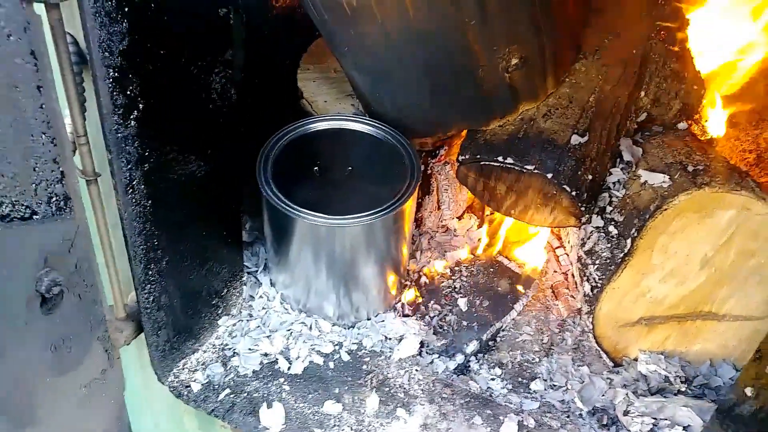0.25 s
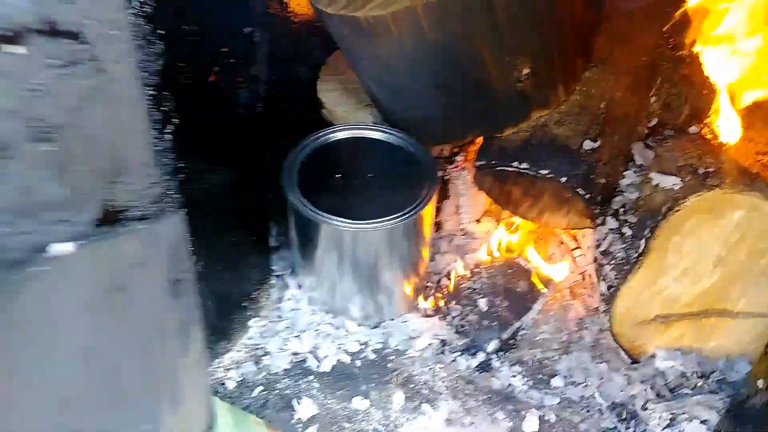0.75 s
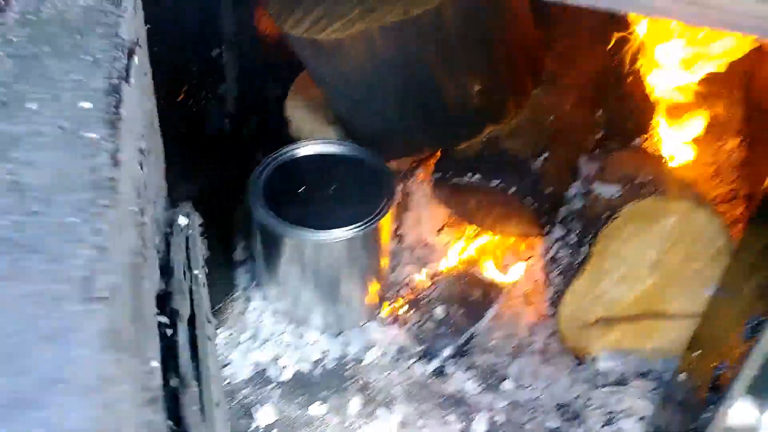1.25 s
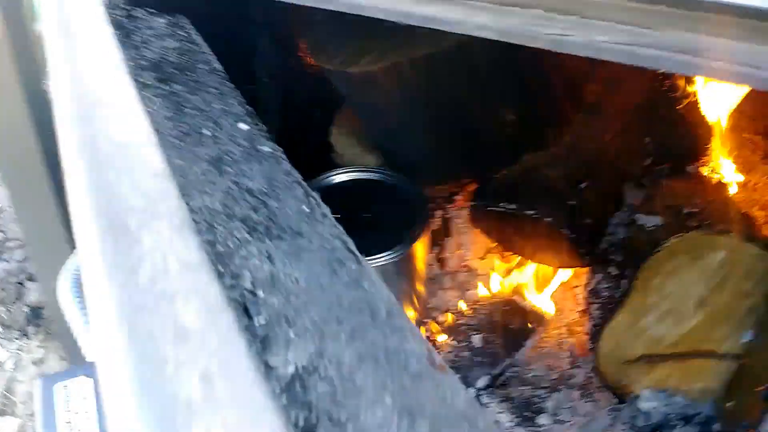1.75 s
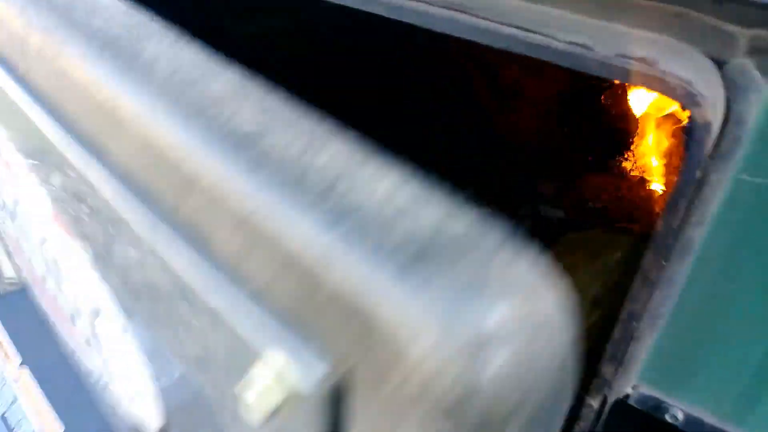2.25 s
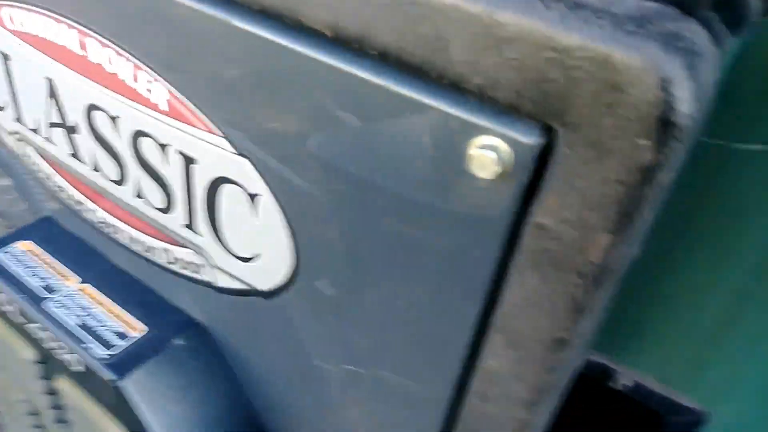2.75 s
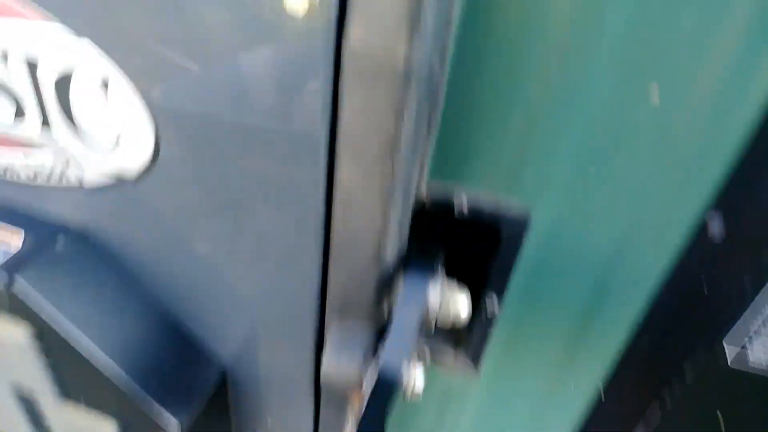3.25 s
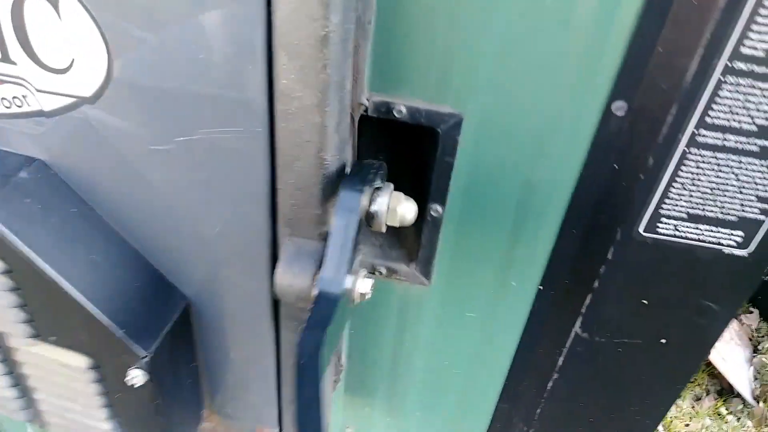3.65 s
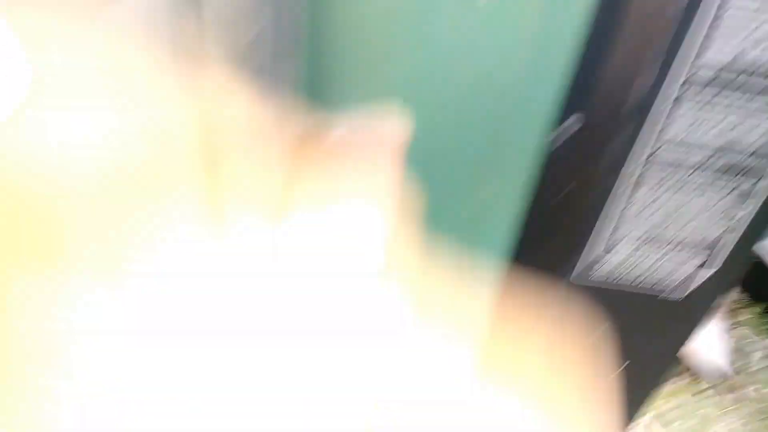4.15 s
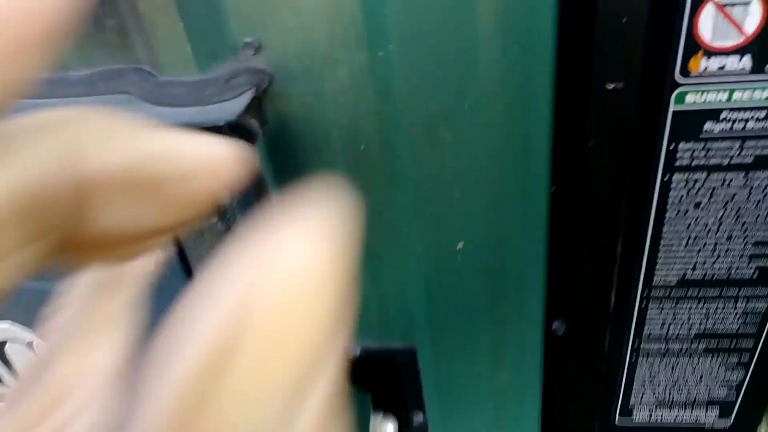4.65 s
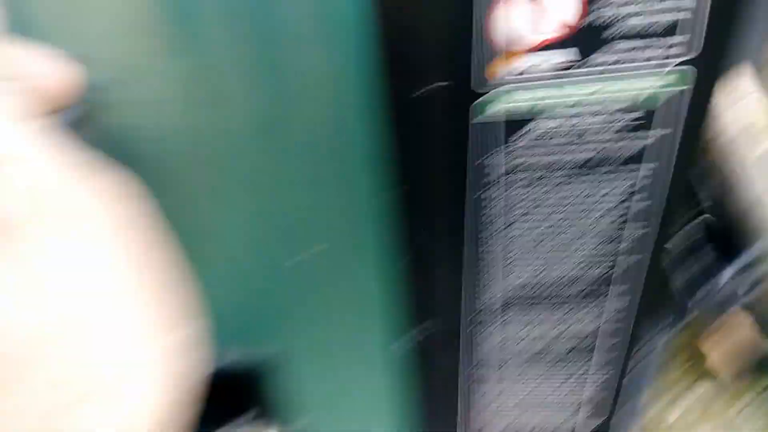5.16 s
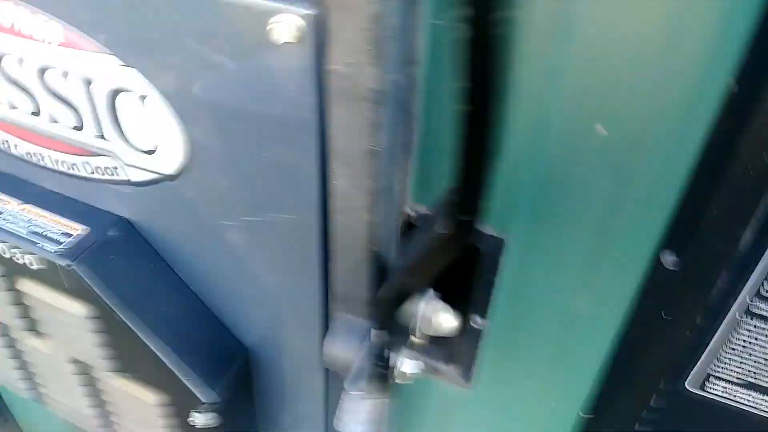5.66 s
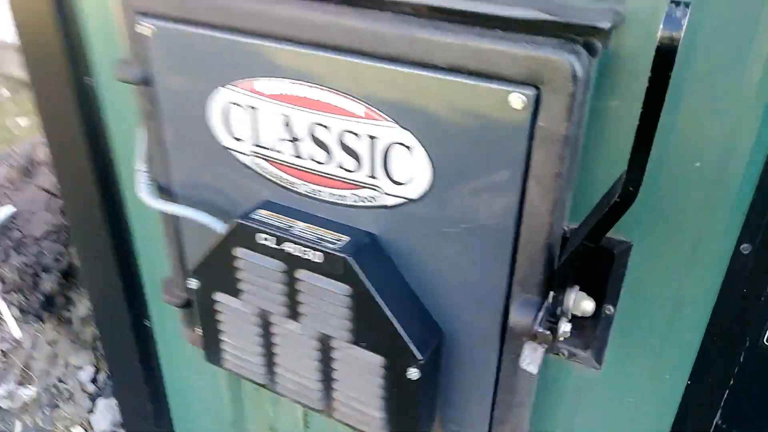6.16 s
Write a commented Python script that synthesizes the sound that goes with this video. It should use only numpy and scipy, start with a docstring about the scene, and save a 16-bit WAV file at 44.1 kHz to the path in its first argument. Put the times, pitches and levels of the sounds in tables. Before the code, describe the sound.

An open wood fire rumbles and snaps among bird calls, then a heavy iron door bumps shut and its lever bangs home in two loud metallic bursts.

```python
"""The iron door of an outdoor wood furnace bumps its frame, and its lever bangs home in two rattling
bursts: each contact knocks, rings the latch and lever as decaying modes and booms in the cabinet.
The fire is shaped noise, muffled by the closing door and hissing in the gap; struck noise bands
make its snaps. Iron rubs and rattles, a motor hums in sines, and birds call in gliding, echoing
tones over faint microphone hiss, until soft rustles mark the microphone backing away."""
import sys
import numpy as np
from scipy import signal
from scipy.fft import rfft, irfft, next_fast_len
from scipy.io import wavfile
from scipy.ndimage import uniform_filter1d, minimum_filter1d, map_coordinates

SR = 44100
rng = np.random.default_rng(int(sys.argv[2]) if len(sys.argv) > 2 else 0)


def waveform_to_disk(signal):
    """Save audio, clipped to [-1, 1], as 16-bit WAV at the path in sys.argv[1]."""
    frames = np.transpose(np.atleast_2d(signal))
    scaled = np.clip(frames, -1, 1) * 32767
    samples = np.round(scaled).astype(np.int16)
    wavfile.write(sys.argv[1], SR, samples)


N = 282841
T = np.arange(N) / SR  # time in seconds

# From this moment the lever is wedged in its catch.
WEDGED_S = 5.0
# The microphone backs away; the hiss is lost fastest.
LEAVE_S, LEAVE_DB_PER_S, LEAVE_HISS_DB_PER_S = 5.41, -14.5, -49

# All levels in the tables are relative, in dB; t60 is the time of a 60 dB decay.
# Metal striking metal. Each row: start in seconds, then the levels in dB of the clank,
# the cabinet boom, the sharp crack and the dead punch of the contact.
BLOWS = [(4.1840, -3, -5.5, -29.5, -1), (4.1955, -19, 3, -14.5, -20.5), (4.2217, 5.5, -14.5, 1, 2),
         (4.2268, 0, -5, -23, 3), (4.2350, -6, 1, -6.5, -4.5), (4.2502, -3, -2, -3.5, -4.5),
         (4.2595, 2.5, -2, -0.5, -6.5), (4.2733, -2.5, -7, -5, 3), (4.2880, -2, -11, -21.5, -3),
         (4.2975, 2.5, -1.5, -22, -12.5), (4.473, -31.5, -20.5, -26.5, -43),
         (4.484, -33.5, -34, -32.5, -47), (4.561, -50.5, -32.5, -30.5, -51), (4.6000, -44, -24, -37, -48),
         (5.1115, -22.5, -42, -26.5, -35.5), (5.1180, 4.5, -31, -27.5, -8), (5.1235, 1, -24, -18.5, -6),
         (5.1290, -3, -29.5, -19, -6.5), (5.1364, -3.5, -19, -11.5, 0.5), (5.1413, -4.5, -9, -20.5, -9),
         (5.1528, -5.5, -6.5, -5, -8), (5.1565, -21.5, 4, -29, -7.5), (5.1800, -25.5, -9, -23, -24.5)]
# The door bumping its frame. Each row: start in seconds, thud level in dB, crack level in dB.
BUMPS = [(2.931, -5, -18.5), (2.9345, -22, -61), (2.9399, -19, -45), (2.9468, -16.5, -60),
         (2.992, -25.5, -37), (3.025, -29, -39)]
# Modes of the cast door slab. Each row: frequency in Hz, level in dB, t60 in seconds.
SLAB = [(203.5, -14, 0.44), (244, -10, 0.13), (298, -2.5, 0.13), (386, -4.5, .2), (447.5, -16.5, 0.15),
        (559, -5.5, 0.19), (728, -12.5, 0.21), (1217, -6.5, 0.089), (1505, -12.5, 0.024), (1830, -1, 0.077),
        (2050, -1, 0.04)]
# Modes of the steel lever and its latch. Each row: frequency in Hz, level in dB while free,
# level in dB once wedged in the catch, t60 in seconds before the wedged limit.
LEVER = [(727, 1.5, -19, .16), (807, -3.5, -7, .23), (884, -.5, -10, .23), (917, -11, -20, .4),
         (1023, -3, -3, .16), (1041, -7, -.5, .16), (1104, -4, -12, .15), (1157, -2, -15, .18),
         (1180, -4, -11.5, .22), (1208, -1, -12.5, .2), (1262, -5.5, -16, .2), (1280, -4, -15.5, .23),
         (1394, -5.5, -8.5, .26), (1417, -2, -2, .16), (1432, -4, -2, .16), (1545, -6.5, -13.5, .2),
         (1620, -9, -7.5, .15), (1712, -8.5, -8, .22), (1868, -6, -8, .22), (1910, -7.5, -13.5, .2),
         (2003, -12.5, -10, .2), (2044, -10.5, -2, .18), (2105, -9.5, -5, .15), (2247, -8, -21, .15),
         (2893, -17.5, -21, .22), (4734, -17, -27, .14), (5390, -22, -36, .13)]
# The lever's longer, weaker modes. Each row: frequency in Hz, level in dB while free,
# level in dB once wedged, t60 in seconds before the wedged limit.
AFTER_RING = [(1550, -24, -30, .8), (1981, -20, -24, .62), (2051, -20.5, -25, .95), (2313, -29, -28, .9),
              (3052, -28, -39, .55), (3440, -36, -46, .75), (3693, -27.5, -44, .62), (3732, -28, -44, .66),
              (3876, -35, -44, .55), (4958, -38, -50, .5), (6842, -45, -62, .45)]
# Modes of the door slab and cabinet panels. Each row: frequency in Hz, level in dB while free,
# level in dB once clamped together, t60 in seconds before the clamped limit.
CABINET = [(94, -21.5, -25, 0.96), (139, -18.5, -18.5, 0.55), (169, -2.5, 6.5, 0.46),
           (181.2, -13.5, 1.5, 0.55), (202.7, -17.5, -1.5, 0.92), (222, 2, 4.5, 0.5),
           (247.5, -10, -4.5, 0.76), (257.2, 1, 0, 0.32), (281, -3.5, 5.5, 0.17), (333.4, -7, -11.5, 0.6),
           (377, -11.5, -8, 0.35), (444, -12.5, -5, 0.6), (538, -15.5, 1, 0.26), (535, -21.5, -24, 0.85),
           (630, -15.5, -21, 0.35), (836, -20.5, -22, 0.31)]
# Crowds of weaker modes in the slab, the latch and the cabinet, then in the cracks of the blows
# and of the door's edge. Each row: frequency in Hz, level in dB, t60 in seconds.
SLAB_CROWD = [(60, -11, 0.3), (269.4, 6.5, 0.51), (550, -5.5, 0.39), (936, -4, 0.0847), (1730, 4.5, 0.15),
              (2126, -24, 0.073), (2946, -24, 0.038), (6300, -21, 0.045), (9900, -73, .05)]
LATCH_CROWD = [(200, -15, 0.034), (570, 6.5, 0.12), (989, 10, 0.052), (2130, 3.5, 0.16),
               (2520, -19.5, 0.12), (4950, -43.5, 0.45), (9000, -77, .1), (16000, -57.5, 0.07)]
CABINET_CROWD = [(24.68, -22, 0.24), (60.5, -19.5, .6), (110, -9.5, 1), (250.2, -4.5, 1), (513, -11, 0.68),
                 (1040, -11, 0.42), (1780, -16.5, 0.59), (3100, -21, 0.3), (8130, -54, 0.3)]
CRACK_CROWD = [(300, -15.5, .05), (1500, 14, 0.17), (2780, 12.5, 0.063), (5030, 4, 0.15), (7900, -11, 0.13),
               (10500, -31.5, 0.11), (13440, -19, 0.25), (16000, -29, 0.071)]
EDGE_CROWD = [(900, -4, 0.057), (1690, 17, 0.025), (2750, -2, 0.45), (4600, -11.5, 0.33),
              (6200, -9.5, 0.025), (7600, -34, 0.15), (12000, -57.5, .08)]
LEVER_DB = -20


def door():
    """Modal impact: each blow excites latch, lever, cabinet and edges; each bump, the slab and its edge."""
    s, latch_db, boom_db, crack_db, punch_db = np.transpose(BLOWS)
    latch = convolve(pulses(s, latch_db - 13.5), crowd(LATCH_CROWD, attack_db=-5.0, attack_s=0.0053))
    lever = ring_latching(LEVER + AFTER_RING, s, latch_db + LEVER_DB, wedged_t60_s=0.51)

    cabinet = ring_latching(CABINET, s, boom_db - 22.5, wedged_t60_s=0.71)
    cabinet_crowd = crowd(CABINET_CROWD, attack_db=-0.5, attack_s=0.0046)
    cabinet += convolve(pulses(s, boom_db - 21.5), cabinet_crowd)

    bump_s, thud_db, edge_db = np.transpose(BUMPS)
    slab = ring(SLAB, bump_s, thud_db - 17.5)
    slab_crowd = crowd(SLAB_CROWD, attack_db=-7.0, attack_s=0.011)
    slab += convolve(pulses(bump_s, thud_db - 17), slab_crowd)

    crack = convolve(pulses(s, crack_db - 15.0), crowd(CRACK_CROWD, attack_db=1, attack_s=0.0014))
    edge = convolve(pulses(bump_s, edge_db - 11.5), crowd(EDGE_CROWD, attack_db=16.0, attack_s=0.0023))
    struck = punch(s, punch_db) + latch + lever + cabinet + slab + crack + edge
    return yard(struck, wet_db=-14.5, t60_s=0.81, top_hz=670)


# The knock is higher once the lever is wedged.
PUNCH_FREE_HZ, PUNCH_WEDGED_HZ, PUNCH_T60_S = 1160, 1590, 0.017


def punch(times, db):
    """Heavy damping: the knock of each contact is a sine that dies within a few tens of milliseconds."""
    t = T[:SR // 10]
    decay = np.exp(-np.log(1000) * t / PUNCH_T60_S)
    free = times < WEDGED_S
    free_knock = np.sin(2 * np.pi * PUNCH_FREE_HZ * t) * decay
    wedged_knock = np.sin(2 * np.pi * PUNCH_WEDGED_HZ * t) * decay
    return (convolve(pulses(times[free], db[free]), free_knock)
            + convolve(pulses(times[~free], db[~free]), wedged_knock))


def ring_latching(modes, times, db, wedged_t60_s):
    """Boundary conditions: wedging the lever rebalances the modes and limits their decay times."""
    hz, free_db, wedged_db, t60 = np.transpose(modes)
    free = times < WEDGED_S
    before = ring(zip(hz, free_db, t60), times[free], db[free])
    short_t60 = np.minimum(t60, wedged_t60_s)
    return before + ring(zip(hz, wedged_db, short_t60), times[~free], db[~free])


# Loose parts chatter after each bang, ever more weakly.
# Each row: start in seconds, length in seconds, level in dB, change of level in dB per second.
RATTLES = [(4.293, .4, -28.5, -77), (5.19, 0.16, -35.5, -102)]


def rattle():
    """Random impacts: small ticks of loose metal excite a crowd of modes at chance moments."""
    ticks = 0
    for s, length, db, db_per_s in RATTLES:
        chance = rng.random((24, 2))
        late_s = length * chance[:, 0]
        ticks = ticks + pulses(s + late_s, db + db_per_s * late_s - 12 * chance[:, 1])
    return convolve(ticks, crowd(EDGE_CROWD, attack_db=2.0, attack_s=0.00063))


# Dull ticks of the hinge and handle. Each row: start in seconds, level in dB.
TICKS = [(2.372, -17), (2.381, -22), (2.465, -28.5), (2.836, -42), (3.2142, -36), (3.292, -38.5),
         (6.052, -45)]
# Modes of a tick. Each row: frequency in Hz, level in dB, t60 in seconds.
TICK_CROWD = [(600, -10, .07), (1700, 5, .07), (2300, -8, .05), (2980, 4.5, 0.062), (3780, -5, .05),
              (4400, 0, 0.073), (5250, -15, .05), (6000, -9.5, .06), (9000, -33, .04), (14000, -18, .03)]
# Thin scrapes of the hinge. Each row: start, rise and fall in seconds, level in dB.
SCRAPES = [(2.155, 0.048, .25, -56.5), (2.37, 0.016, .5, -51), (3.018, 0.011, 0.11, -46.5)]
# Spectrum of the scrapes. Each row: frequency in Hz, level in dB.
SCRAPE_COLOUR = [(1800, 3), (2300, -1), (2650, -0.5), (2950, 0), (3250, -4.5), (3550, -22), (5000, -26.5)]


def hinge():
    """Impact and friction: ticks strike a crowd of modes, and scrapes are noise in uneven jerks."""
    s, db = np.transpose(TICKS)
    ticks = convolve(pulses(s, db - 21.5), crowd(TICK_CROWD, attack_db=-10.5, attack_s=.004))
    jerks = undb(3 * walk(45))
    envelope = sum(undb(scrape_db) * swell(start, rise, 0, fall)
                   for start, rise, fall, scrape_db in SCRAPES)
    return ticks + envelope * jerks * restless(SCRAPE_COLOUR, ripple_db=6, wander_db=15, rate=15)


# Dry iron rubbing at the hinge and the catch, and low bumps that only rumble. # Each row: start, rise and fall
# in seconds, scrape level in dB, rumble level in dB.
RUBS = [(2.36, 0.015, 0.25, -41.5, -48.5), (4.051, 0.15, .05, -38.5, -37.5),
        (4.35, 0.057, 0.81, -82, -40.5), (5.02, 0.096, .05, -45, -42), (5.349, 0.2, .7, -91, -45.5)]
# Spectrum of the rubbing. Each row: frequency in Hz, level in dB.
RUB_COLOUR = [(200, 1), (300, 0.5), (470, -1), (600, -22.5), (1400, 1), (3000, -23), (7000, -52.5)]


def rubs():
    """Friction excitation: uneven rubs of dry iron scrape and rumble, and low bumps only rumble."""
    scrape = noise(RUB_COLOUR, ripple_db=7.5) * undb(1.4 * walk(60))
    rumble = noise(RUMBLE, ripple_db=5.5) * undb(1.5 * walk(15))
    return sum(swell(s, rise, 0, fall) * (undb(scrape_db) * scrape + undb(rumble_db) * rumble)
               for s, rise, fall, scrape_db, rumble_db in RUBS)


# Spectra of the rumble, the rush with the door open, the rush through the shut door, the hiss
# and the draught in the gap. Each row: frequency in Hz, level in dB.
RUMBLE = [(18, -47.5), (30, -23.5), (60, -4.5), (135, -5.5), (167, 2), (327, -12), (365, -12.5),
          (495, -23.5), (560, -28.5), (730, -34.5), (1230, -120)]
RUSH = [(400, -64), (560, -10.5), (700, -5.5), (850, 0), (1100, 8), (1450, 1), (1750, -13), (2200, -25)]
SHUT_RUSH = [(400, -29.5), (560, -13.5), (680, 3), (850, 7), (1150, 1.5), (1320, -13.5), (1750, -19.5),
             (2200, -30)]
HISS = [(1200, -13.5), (1550, 17), (2000, 5.5), (2500, -14.5), (3000, -5), (3500, -28.5), (5000, -36.5),
        (7000, -58.5)]
GAP_COLOUR = [(650, -45.5), (1100, -33), (1430, 16), (1770, 2.5), (2000, 8.5), (3030, -13.5), (3370, -38),
              (4500, -48), (5850, -78), (9900, -120)]
# The fire with the door open, and the change of level when it is shut.
RUMBLE_DB, RUSH_DB, HISS_DB = -49, -48, -52.5
SHUT_RUMBLE_DB, SHUT_RUSH_DB, SHUT_HISS_DB = -9.5, -3, -16
# The closing door screens the hiss first, then the rumble, then the rush: (from s, to s).
HISS_SCREENED_S, RUMBLE_SCREENED_S, RUSH_SCREENED_S = (0.47, 1.02), (1.97, 3.9), (3.87, 4.16)
# The draught hisses in the narrowing gap and sinks in pitch as the gap closes.
GAP_S, GAP_RISE_S, GAP_HOLD_S, GAP_FALL_S, GAP_DB = 2.14, 0.092, 1, 0.36, -49
GAP_SINK_S, GAP_SINK_OCTAVES_PER_S = 2.8, 0.35


def fire():
    """Turbulence and screening: flames and draught are noise that the door muffles or squeezes to a hiss."""
    away_s = np.maximum(T - LEAVE_S, 0)
    away_db = LEAVE_DB_PER_S * away_s

    rumble_db = RUMBLE_DB + np.interp(T, RUMBLE_SCREENED_S, [0, SHUT_RUMBLE_DB]) + away_db
    rumble = noise(RUMBLE, ripple_db=1.5) * undb(rumble_db + 1.2 * walk(27))

    # square-root shares crossfade the two rushes at even power
    shut = np.interp(T, RUSH_SCREENED_S, [0, 1])
    open_rush = restless(RUSH, ripple_db=7.0, wander_db=7.5, rate=14)
    open_rush = np.sqrt(1 - shut) * open_rush * undb(RUSH_DB + 0.88 * walk(19))
    shut_rush = restless(SHUT_RUSH, ripple_db=5.5, wander_db=8.5, rate=12)
    shut_rush_db = RUSH_DB + SHUT_RUSH_DB + away_db + 1.3 * walk(15)
    shut_rush = np.sqrt(shut) * shut_rush * undb(shut_rush_db)

    hiss_db = HISS_DB + np.interp(T, HISS_SCREENED_S, [0, SHUT_HISS_DB]) + LEAVE_HISS_DB_PER_S * away_s
    hiss = restless(HISS, ripple_db=7.0, wander_db=9, rate=12) * undb(hiss_db + 1.3 * walk(13))

    gap = restless(GAP_COLOUR, ripple_db=7.5, wander_db=5, rate=14)
    gap = sinking(gap, GAP_SINK_S, GAP_SINK_OCTAVES_PER_S) * undb(GAP_DB + 1.4 * walk(20))
    gap = gap * swell(GAP_S, GAP_RISE_S, GAP_HOLD_S, GAP_FALL_S)
    return rumble + open_rush + shut_rush + hiss + gap


# Spectrum of the open firebox's resonance. Each row: frequency in Hz, level in dB.
HOLLOW_COLOUR = [(480, -55), (600, 3), (720, 4), (860, -20), (1050, 3)]
# The resonance is lost as the door swings across the firebox.
HOLLOW_DB, HOLLOW_FADE_S, HOLLOW_FADE_LENGTH_S = -55, 1.45, 0.58


def firebox():
    """Cavity resonance: the draught sounds hollow in the open firebox, as noise in a few narrow bands."""
    hollow = noise(HOLLOW_COLOUR, ripple_db=7) * undb(HOLLOW_DB + 2.6 * walk(12.04))
    return hollow * (1 - ramp(HOLLOW_FADE_S, HOLLOW_FADE_LENGTH_S))


# Snaps of burning wood. Each row: start in seconds, level in dB.
SNAPS = [(0.0855, -26.5), (0.407, -32), (0.4640, -11), (0.562, -33), (.742, -29.5), (1.018, -48),
         (1.1217, -28.5), (1.885, -38.5)]
# Modes of a snap. Each row: frequency in Hz, level in dB, t60 in seconds.
SNAP_CROWD = [(810, -11, 0.023), (2730, -1, 0.0053), (3920, 4, 0.031), (7100, -11, 0.021),
              (10000, -22, 0.026), (15000, -8, .02)]


def snaps():
    """Impulsive release: pockets burst in the wood, and the bright tick grows faster than the body."""
    # faint extra snaps, densest at the start
    chance = rng.random((16, 2))
    faint = np.column_stack([2.0 * chance[:, 0] ** 2, -60 + 10 * chance[:, 1]])
    s, db = np.vstack([SNAPS, faint]).T
    body = convolve(pulses(s, db - 23.0), crowd(SNAP_CROWD, attack_db=3.5, attack_s=0.0032))
    tick = rng.standard_normal(SR // 20) * np.exp(-T[:SR // 20] / 0.00031)
    return body + convolve(pulses(s, 1.5 * db - 14), tick)


# The crackles start within this first stretch.
SIZZLE_END_S, SIZZLE_DB = 1, -63


def sizzle():
    """Superposed impulses: sap fizzes in the embers as tiny crackles that thin out."""
    chance = rng.random((260, 2))
    s = SIZZLE_END_S * chance[:, 0] ** 2
    crackle = crowd(SNAP_CROWD, attack_db=9.5, attack_s=0.0011)
    fizz = convolve(pulses(s, SIZZLE_DB - 16 * chance[:, 1]), crackle)
    return signal.sosfilt(signal.butter(4, 6000, fs=SR, output="sos"), fizz)


# Mains hum of the motor. Each row: frequency in Hz, level in dB with the microphone near.
HUM = [(120, -57), (360, -61)]
# The motor is loudest while the microphone is near.
NEAR_S, NEAR_RISE_S, NEAR_HOLD_S, NEAR_FALL_S, FAR_DB = 1, 1.1, 1, 0.78, -4


def motor():
    """Harmonic hum: steady sines grow as the microphone comes near and fade as it backs away."""
    near = swell(NEAR_S, NEAR_RISE_S, NEAR_HOLD_S, NEAR_FALL_S)
    distance_db = FAR_DB * (1 - near) + LEAVE_DB_PER_S * np.maximum(T - LEAVE_S, 0)
    return sum(undb(db + distance_db + 2 * walk(6)) * tone(np.full(N, hz)) for hz, db in HUM)


def birds():
    """Superposition: a long note, whistles, a far chorus and chirps reach the ear with scattered echoes."""
    calls = long_note() + whistles() + chorus()
    return yard(calls, wet_db=-4, t60_s=0.32, top_hz=7000) + chirps()


# The partials of the buzz. Each row: frequency in Hz as the fade begins, reached by a slow sag,
# level in dB.
BUZZ = [(3235, -1), (3505, -15), (3680, 1), (3865, -1), (4156, -13), (4323, -9), (4662, -8), (4813, -20),
        (5600, -22.5), (6440, -20.5), (6600, -20), (7350, -26), (7520, -35), (8350, -42)]
# The nearest bird's long note slides down onto its pitch and trembles.
NOTE_S, NOTE_RISE_S, NOTE_HOLD_S, NOTE_FALL_S, NOTE_DB = .41, 0.035, 0.62, 0.064, -47.5
NOTE_HZ, SLIDE_HZ, SLIDE_S, TRILL_HZ = 2725, 317, 0.019, 27.28
TRILL_DEPTH, NOTE_JITTER = .006, .006  # shares of the pitch
# A buzz joins in the second half.
BUZZ_S, BUZZ_RISE_S, BUZZ_HOLD_S, BUZZ_FALL_S, BUZZ_DB = 0.755, 0.0626, 0.13, 0.13, -56.5
BUZZ_SAG_PER_S, BUZZ_JITTER, BUZZ_FLUTTER_DB = 0.024, .02, 3  # sag and jitter are shares of the pitch


def long_note():
    """Frequency modulation: a trembling note is joined by a rough buzz of close, slowly sagging partials."""
    trill = tone(TRILL_HZ + 3 * walk(9.84))
    hz = NOTE_HZ + SLIDE_HZ * np.exp(-np.maximum(T - NOTE_S, 0) / SLIDE_S)
    hz = hz * (1 + NOTE_JITTER * walk(400) + TRILL_DEPTH * trill)
    # the sag passes 1 as the buzz begins to fade
    sag = 1 - BUZZ_SAG_PER_S * (T - BUZZ_S - BUZZ_RISE_S - BUZZ_HOLD_S)
    overtones = undb(-11) * tone(1.2 * hz * sag + 80 * walk(300))
    overtones += undb(-20 + 2.2 * trill) * tone(1.83 * hz * sag + 40 * walk(300))
    note = (tone(hz) + overtones) * undb(2 * trill + 0.98 * walk(30.3))

    buzz = 0
    for partial_hz, db in BUZZ:
        level = undb(db + BUZZ_FLUTTER_DB * walk(50))
        buzz = buzz + level * tone(partial_hz * sag * (1 + BUZZ_JITTER * walk(1800)))
    return (undb(NOTE_DB) * swell(NOTE_S, NOTE_RISE_S, NOTE_HOLD_S, NOTE_FALL_S) * note
            + undb(BUZZ_DB) * swell(BUZZ_S, BUZZ_RISE_S, BUZZ_HOLD_S, BUZZ_FALL_S) * buzz)


# Two-syllable bird calls. Each row: start in seconds, level in dB, pitch in Hz,
# rise of the first syllable in Hz.
CHIRPS = [(0.019, -51.5, 3570, 497), (0.381, -43, 3574, -700), (1.472, -48.5, 3030, 1152),
          (1.599, -46, 3154, 895), (1.76, -46.5, 3410, 446), (1.921, -49.5, 3430, -200),
          (3.849, -59, 3440, 600.5), (4.059, -56, 3290, 597), (4.131, -56.5, 4360, 300)]
# Single echoes from nearby walls. Each row: delay in seconds, level in dB.
CHIRP_ECHOES = [(.021, -10), (0.048, -11)]
# Each call opens with a high upward flick; a weaker second syllable follows.
FLICK_HZ, FLICK_RISE_HZ, FLICK_S, FLICK_DB = 4240, 1232, .02, -7.5
SYLLABLE_LATE_S, SYLLABLE_S, SECOND_LATE_S, SECOND_S, SECOND_DB = .01, 0.044, .064, .048, -4.5
# The rasp is the spread of pitch and level.
RASP_HZ, RASP_DB = 280, 3.5


def chirps():
    """Gliding tones: each call is a high flick, a syllable and a weaker repeat, roughened by chance."""
    out = np.zeros(N)
    rasp_hz = RASP_HZ * walk(500)
    grain = undb(RASP_DB * walk(140))
    for s, db, hz, rise_hz in CHIRPS:
        strokes = [(s, FLICK_S, FLICK_HZ, FLICK_RISE_HZ, db + FLICK_DB),
                   (s + SYLLABLE_LATE_S, SYLLABLE_S, hz, rise_hz, db),
                   (s + SECOND_LATE_S, SECOND_S, hz, 0, db + SECOND_DB)]
        for start, length, from_hz, glide_hz, stroke_db in strokes:
            i, along = int(start * SR), np.linspace(0, 1, int(length * SR))
            span = slice(i, i + len(along))
            envelope = np.minimum(along / 0.29, 1) * np.minimum((1 - along) / .5, 1) * grain[span]
            out[span] += undb(stroke_db) * envelope * tone(from_hz + glide_hz * along + rasp_hz[span])
    out = signal.sosfilt(signal.butter(3, [2500, 5900], "bandpass", fs=SR, output="sos"), out)
    echo_s, echo_db = np.transpose(CHIRP_ECHOES)
    echoes = convolve(out, pulses(echo_s, echo_db))
    return yard(out + echoes, wet_db=-4.5, t60_s=0.39, top_hz=6000)


# Faint drawn-out whistles and squeaks. Each row: start in seconds, length in seconds,
# first pitch in Hz, last pitch in Hz, arch in Hz, level in dB, roughness from 0 to 1.
WHISTLES = [(-.06, 0.39, 730, 717, 4.5, -51, 0.1), (0.164, .48, 721.3, 720, 3, -49.5, 0),
            (0.116, .24, 3340, 3280, 37, -54.5, 0.71), (0.252, 0.066, 5100, 4950, 37, -60, 0.2),
            (.31, 0.047, 2360, 2060, 1, -45, 0.13), (1.174, .07, 2400, 2120, 3, -63.5, 0.54),
            (1.262, .12, 2190, 2060, 17, -59, 0.42), (1.371, .11, 1960, 1720, 0, -61, 0.47),
            (3.255, .03, 1244, 1170, 4, -42.5, 0.17), (3.34, .05, 870, 840, 7, -48, 0.54),
            (3.439, .05, 847, 817, -8, -46, 0.42), (3.642, 0.25, 3220, 3036, 137.5, -61, 0.03),
            (3.618, 0.3, 1305, 1239, 42, -45.5, 0.13), (4.594, .07, 1588, 1469, 3, -66, 0.42),
            (4.867, .08, 1680, 1540, 13.5, -60, 0.2), (4.814, .1, 3200, 3350, -1, -69, 0.26),
            (4.808, .06, 2920, 2895, -4, -60.5, .4), (4.86, 0.095, 2620, 2555, 2.5, -57.5, 0.2),
            (5.03, 0.046, 2650, 2796, 1.5, -56, 1), (5.452, .05, 2190, 2200, -2.5, -59, 0.69),
            (5.651, .055, 2256, 2200, 1, -61.5, 0.64), (5.731, .035, 2230, 2143, -1, -63.5, 0.87),
            (5.82, .055, 2193, 2190, -0.5, -63, 0.78), (5.991, .06, 1217, 1162, 1.5, -62.5, 0.26),
            (6.094, .05, 1195, 1170, 2.5, -60.5, .4), (6.152, .11, 1003, 953, 16.5, -57.5, 0.33),
            (6.211, .1, 730, 704, -5.5, -66.5, 0.42)]
# The edge is a share of the length, the jitter a share of the pitch; roughness scales the last two.
WHISTLE_EDGE_SHARE, WHISTLE_JITTER, WHISTLE_FLUTTER_DB = 0.56, 0.044, 2.5


def whistles():
    """Pitch glide: each whistle swells along a shallow arch and fades; the rough ones waver."""
    out = np.zeros(N)
    jitter = WHISTLE_JITTER * walk(500)
    flutter = WHISTLE_FLUTTER_DB * walk(40)
    for s, length, first_hz, last_hz, arch_hz, db, rough in WHISTLES:
        along, edge_s = ramp(s, length), WHISTLE_EDGE_SHARE * length
        hz = first_hz + (last_hz - first_hz) * along + arch_hz * np.sin(np.pi * along)
        # the fade begins just before the rise is complete
        envelope = swell(s, edge_s, length - 2 * edge_s, edge_s)
        out += envelope * undb(db + rough * flutter) * tone(hz * (1 + rough * jitter))
    return out


# Higher and later notes are weaker.
CHORUS_END_S, CHORUS_DB, CHORUS_LOW_HZ, CHORUS_OCTAVES = 1.3, -47.5, 948, 1.5
CHORUS_DB_PER_OCTAVE, CHORUS_DB_PER_S = -6, -9.5


def chorus():
    """Random superposition: far-off birds throw in short, wavering notes at chance pitches."""
    out, waver = np.zeros(N), 1 + .012 * walk(200)
    for when, height, glide, span in rng.random((36, 4)):
        s, octaves = CHORUS_END_S * when ** 1.5, CHORUS_OCTAVES * height
        i, along = int(s * SR), np.linspace(0, 1, int((0.041 + 0.067 * span) * SR))
        hz = CHORUS_LOW_HZ * 2 ** (octaves + 0.213 * (glide - .5) * along) * waver[i:i + len(along)]
        level = undb(CHORUS_DB + CHORUS_DB_PER_OCTAVE * octaves + CHORUS_DB_PER_S * s)
        out[i:i + len(along)] += level * np.sin(np.pi * along) * tone(hz)
    return out


# Soft rustles of stepping back. Each row: start, rise and fall in seconds, level in dB.
RUSTLES = [(5.43, 0.072, .4, -56.5), (5.76, 0.065, 0.2, -57), (5.986, 0.031, .15, -52.5),
           (6.195, 0.035, 0.15, -63), (6.376, .03, .1, -55.5)]
# Spectrum of the rustles. Each row: frequency in Hz, level in dB.
RUSTLE_COLOUR = [(450, -17), (660, 22), (780, -13), (950, 2.5), (1400, -49), (2500, -38)]


def rustles():
    """Modulated noise: soft, uneven rustles as the microphone is carried back."""
    envelope = sum(undb(db) * swell(s, rise, 0, fall) for s, rise, fall, db in RUSTLES)
    flutter = undb(2 * walk(25))
    return envelope * flutter * noise(RUSTLE_COLOUR, ripple_db=0.0)


# Spectrum of the microphone hiss. Each row: frequency in Hz, level in dB.
MICROPHONE_HISS = [(1500, 7.5), (4000, -1.5), (6000, -3.5), (9000, -11), (15000, -22)]


def microphone_hiss():
    """Stationary noise: the faint steady hiss of the microphone."""
    return undb(-81.5) * noise(MICROPHONE_HISS, ripple_db=3.0)


def ring(modes, times, db):
    """Modal synthesis: blows on one spot drive decaying sines, never a mode equally hard."""
    out, first = np.zeros(N), int(min(times) * SR)
    at = (np.asarray(times) * SR).astype(int) - first
    for hz, mode_db, t60 in modes:
        push = np.zeros(min(N - first, 2 * SR))
        push[at] = undb(db + mode_db + 4.7 * (rng.random(len(at)) - .5))
        pole = np.exp((2j * np.pi * hz - np.log(1000) / t60) / SR)
        phase = np.exp(2j * np.pi * rng.random())
        swing = (signal.lfilter([1], [1, -pole], push) * phase).imag
        # the contact lasts about half a cycle of the mode, which rounds its start
        contact = signal.butter(2, min(2 * hz, SR / 3), fs=SR, output="sos")
        out[first:first + len(push)] += signal.sosfilt(contact, swing)
    return out


def crowd(rows, attack_db, attack_s):
    """Modal density: modes too close to tell apart act as third-octave bands of decaying noise."""
    hz, db, t60 = np.transpose(rows)
    t = T[:2 * SR]
    octave = np.log2(np.fft.rfftfreq(len(t), 1 / SR) + 1)
    phase = np.exp(2j * np.pi * rng.random(len(octave)))
    spectrum = phase * undb(np.interp(octave, np.log2(hz), db, left=-60))
    spectrum /= np.std(irfft(spectrum))
    out = 0
    for centre in np.arange(12, 44) / 3:  # octaves above 1 Hz
        band = irfft(spectrum * np.clip(1 - 3 * abs(octave - centre), 0, 1))
        onset = 1 - np.exp(-(2 * t * 2 ** centre) ** 2)  # within a cycle
        out = out + band * onset * undb(-60 * t / np.interp(centre, np.log2(hz), t60))
    return out * (1 + undb(attack_db) * np.exp(-t / attack_s))  # stronger first instant


def yard(x, wet_db, t60_s, top_hz):
    """Diffuse reverberation: trees and walls return scattered echoes as a decaying noise tail."""
    t = T[:2 * SR]
    tail = rng.standard_normal(len(t)) * undb(-60 * t / t60_s) * (1 - np.exp(-t / .02))
    tail /= np.linalg.norm(tail)
    tail = signal.sosfilt(signal.butter(2, min(top_hz, SR / 3), fs=SR, output="sos"), tail)
    return x + undb(wet_db) * convolve(x, tail)


def noise(points, ripple_db, spacing_hz=30):
    """Spectral shaping: noise of rms 1 in a (Hz, dB) colour, rippled by many narrow resonances."""
    hz, db = np.transpose(points)
    n = next_fast_len(N)
    f = np.fft.rfftfreq(n, 1 / SR) + 1
    grid = np.arange(0, SR / 2, spacing_hz)
    ripple = ripple_db * np.interp(f, grid, rng.standard_normal(len(grid)))
    colour = undb(np.interp(np.log(f), np.log(hz), db, left=-90, right=-90) + ripple)
    return unit(irfft(rfft(rng.standard_normal(n)) * colour, n)[:N])


def restless(points, ripple_db, wander_db, rate):
    """Shifting resonance: differently rippled noises take turns at an even total power."""
    shares = np.array([undb(wander_db * walk(rate)) for _ in range(5)])
    shares /= np.linalg.norm(shares, axis=0)
    return sum(share * noise(points, ripple_db, spacing_hz=70) for share in shares)


def sinking(x, start_s, octaves_per_s):
    """Time stretching: slowing the playback of x makes all its resonances glide down together."""
    speed = 2 ** (-octaves_per_s * np.maximum(T - start_s, 0))
    return map_coordinates(x, [np.cumsum(speed)], order=3, mode="mirror")


def tone(hz):
    """Phase integration: a sine of rms 1 that follows a pitch curve."""
    return np.sqrt(2) * np.sin(2 * np.pi * np.cumsum(hz) / SR)


def walk(rate):
    """Low-passed chance: a random curve with spread near 1, drawn anew at the given rate in Hz."""
    k = int(SR / rate)
    steps = np.repeat(rng.standard_normal(N // k + 1), k)
    return 1.3 * uniform_filter1d(steps, k)[:N]


def ramp(start_s, length_s):
    """Linear interpolation: a straight rise from 0 to 1."""
    return np.clip((T - start_s) / max(length_s, 1 / SR), 0, 1)


def swell(start_s, rise_s, hold_s, fall_s):
    """Amplitude envelope: attack, hold and release."""
    return ramp(start_s, rise_s) * (1 - ramp(start_s + rise_s + hold_s, fall_s))


def pulses(times, db):
    """Impulse excitation: one impulse for each event."""
    x = np.zeros(N)
    np.add.at(x, (np.asarray(times) * SR).astype(int), undb(db))
    return x


def convolve(x, response):
    """Linear superposition: play x through an impulse response."""
    return signal.fftconvolve(x, response)[:N]


def undb(db):
    """Logarithmic level: decibels to gain."""
    return 10 ** (np.asarray(db) / 20)


def unit(x):
    """Root-mean-square level: scale to rms 1."""
    return x / np.sqrt(np.mean(x ** 2))


def scene():
    """Superposition: door, fire, motor, birds, rustles and hiss add at one microphone."""
    ironwork = door() + rattle() + hinge() + rubs()
    furnace = fire() + firebox() + snaps() + sizzle()
    background = motor() + birds() + rustles() + microphone_hiss()
    return (ironwork + furnace + background)[None]


TOP_HZ = 15900


def record(dry):
    """Band limits and saturation: deep bass is shed, a limiter holds the bangs, tips clip, the top is cut."""
    thin = signal.sosfilt(signal.butter(3, 62, "high", fs=SR, output="sos"), dry)
    gain = minimum_filter1d(1 / np.maximum(abs(thin) / 1.1, 1), size=61)
    gain = uniform_filter1d(uniform_filter1d(gain, size=41), size=41)
    clipped = np.clip(thin * gain, -1, 1)
    return signal.sosfilt(signal.ellip(8, .2, 70, TOP_HZ, fs=SR, output="sos"), clipped)


dry = scene()
out = record(dry)
waveform_to_disk(out)
```